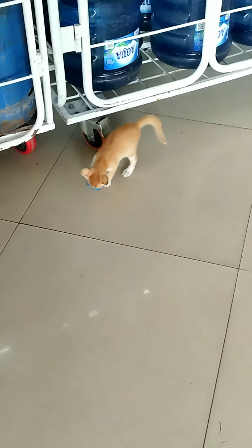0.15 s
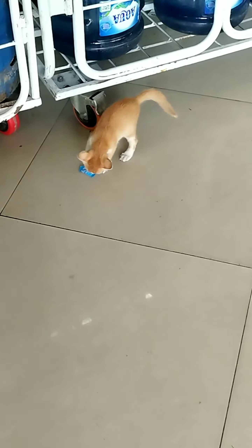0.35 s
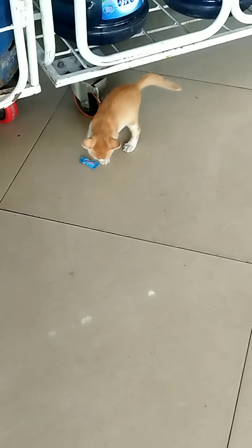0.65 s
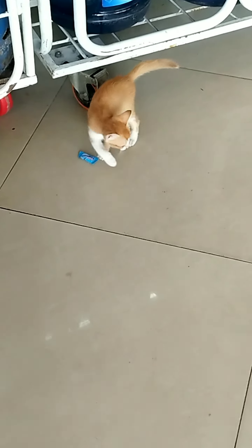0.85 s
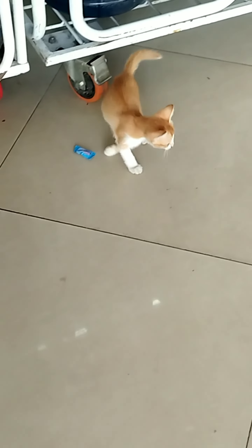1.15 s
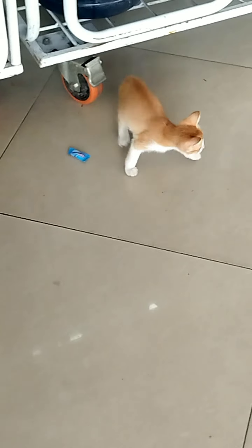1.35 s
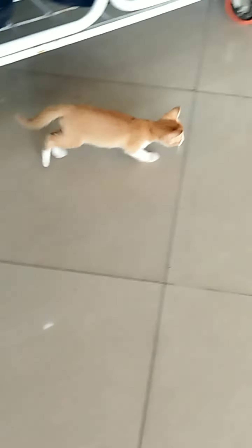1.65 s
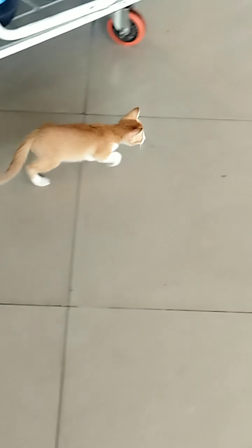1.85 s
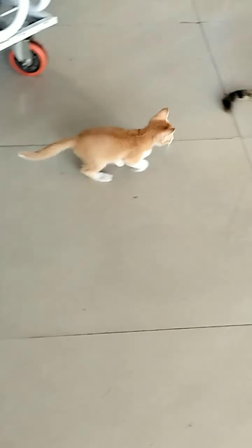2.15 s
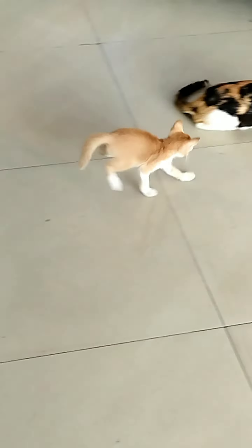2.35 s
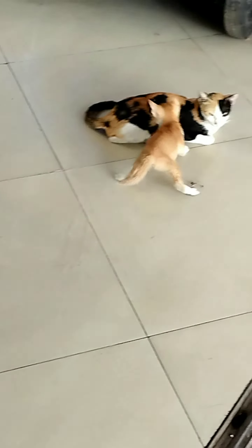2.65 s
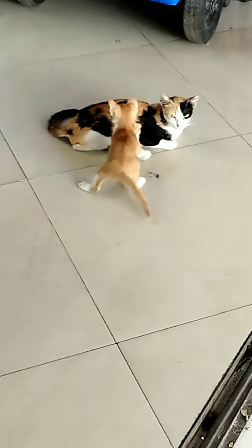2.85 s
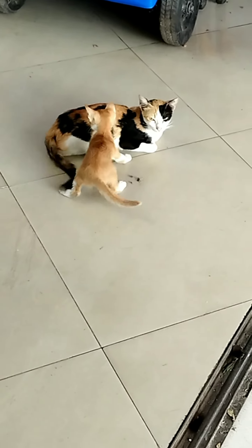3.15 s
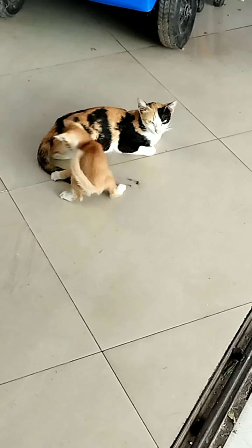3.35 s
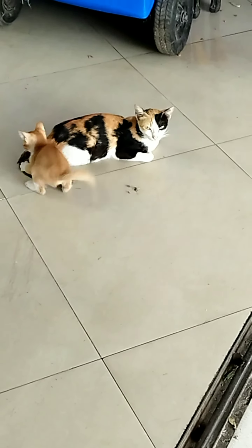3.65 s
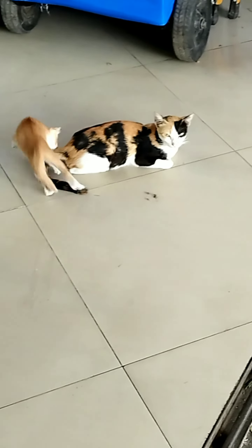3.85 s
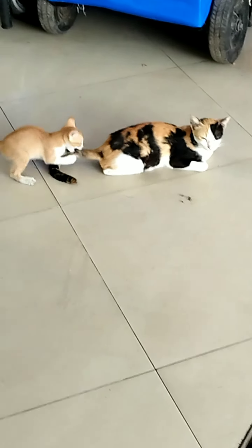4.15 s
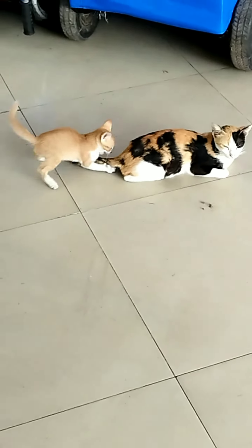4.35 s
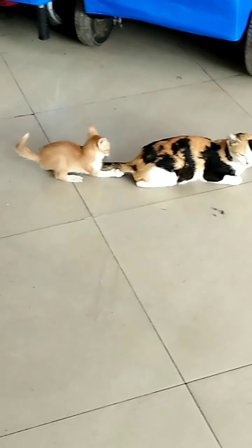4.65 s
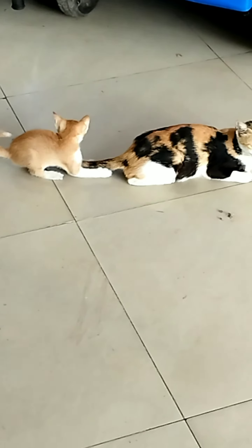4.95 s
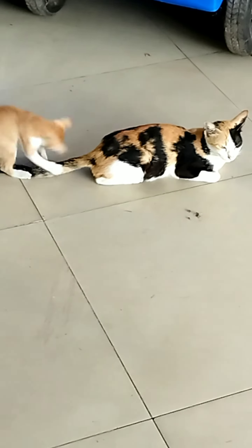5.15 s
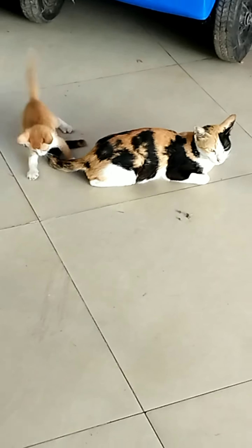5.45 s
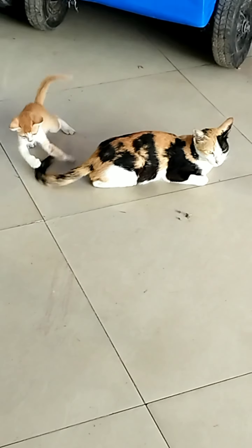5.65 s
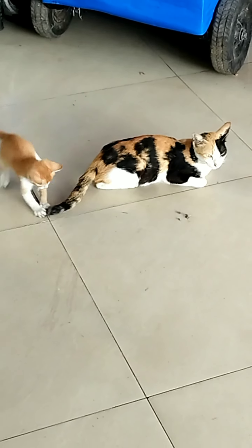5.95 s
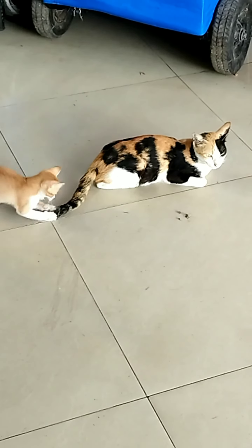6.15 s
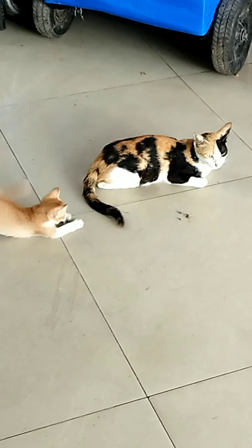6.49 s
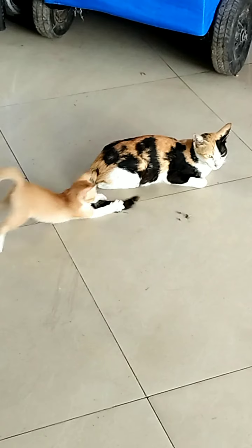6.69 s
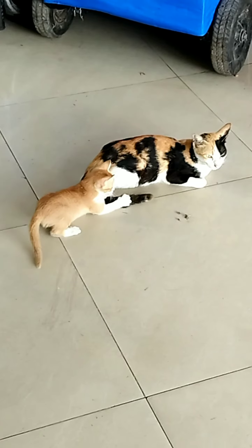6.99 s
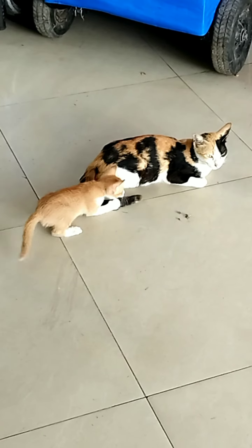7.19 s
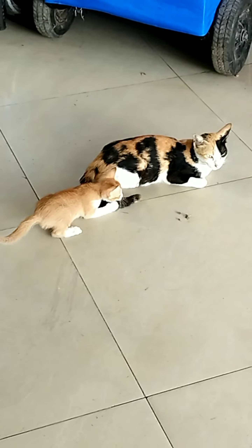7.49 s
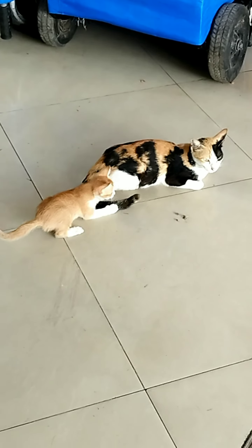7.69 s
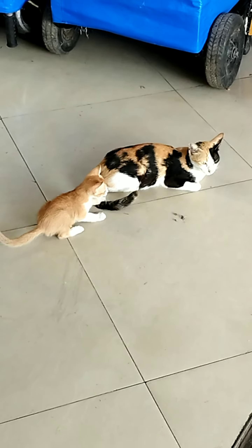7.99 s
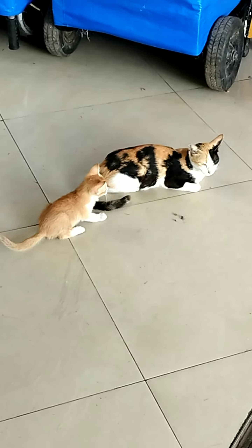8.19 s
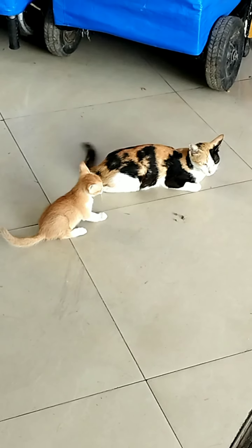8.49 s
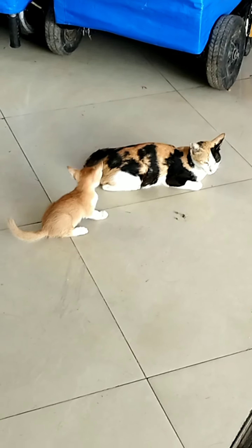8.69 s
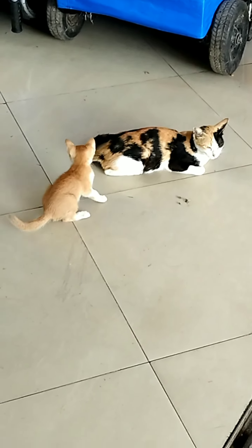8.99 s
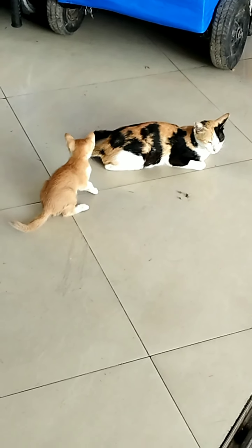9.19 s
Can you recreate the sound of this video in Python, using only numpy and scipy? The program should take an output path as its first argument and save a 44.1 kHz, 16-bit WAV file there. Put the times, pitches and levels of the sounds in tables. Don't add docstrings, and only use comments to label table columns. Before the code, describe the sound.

Low chugging motor idles far off, grows slowly louder toward an open tiled shop, with traffic rumble, fan whine and faint brake squeaks.

```python
import sys
import numpy as np
from scipy import signal
from scipy.io import wavfile
from scipy.ndimage import uniform_filter1d, minimum_filter1d

SR = 44100
rng = np.random.default_rng(int(sys.argv[2]) if len(sys.argv) > 2 else 0)


def generate_wav(sig):
    pcm = np.round(np.clip(np.atleast_2d(sig).T, -1, 1) * 32767).astype(np.int16)
    wavfile.write(sys.argv[1], SR, pcm)


def linear_from_db(decibels):
    return 10 ** (np.asarray(decibels, float) / 20)


N = 411453


def rms_one(x):
    return x / np.sqrt(np.mean(x ** 2) + 1e-20)


def in_time(rows):
    s, *columns = np.transpose(rows)
    return [np.interp(np.arange(N) / SR, s, c) for c in columns]


def at_hz(points, hz):
    table_hz, values = np.transpose(points)
    return np.interp(np.log(hz), np.log(np.maximum(table_hz, 1)), values)


def bump(s, half):
    return np.exp(-((np.arange(N) / SR - s) / half) ** 2)


def drift(rate):
    r = np.exp(-80 * np.pi * rate / SR)
    noise = rng.standard_normal(N // 40 + 2002)
    slow = signal.lfilter([1], [1, -2 * r, r * r], noise)[2000:]
    return np.interp(np.arange(N) / 40, np.arange(len(slow)), rms_one(slow - slow.mean()))


def resonance(x, hz, width):
    r = np.exp(-np.pi * width / SR)
    poles = [1, -2 * r * np.cos(2 * np.pi * hz / SR), r * r]
    return signal.lfilter(np.array([1, 0, -1]) * (1 - r * r) / 2, poles, x)


def whistle(hz, width):
    noise = rng.standard_normal((2, N))
    return rms_one(resonance(resonance(noise, hz, width), hz, width))


def pan(x, db):
    return x * linear_from_db(np.array([[db / 2], [-db / 2]]))


# multiple, level/dB, share of nearness, gain in line with the doorway/dB
ORDERS = [(2, -57.5, 0.2, -14), (3, -32.5, 0.86, 0.5), (4.25, -31.0, 0.94, 4), (4.93, -20, 1.08, 6.5),
          (6.09, -24.5, 1.25, 14), (7.12, -38.5, 0.3, 9.5), (7.8, -42, 0.32, 1), (8.8, -38.5, 1.87, 10),
          (9.7, -34.0, 0.95, 11.5), (11.2, -42.5, 0.9, 5.5), (12, -46, 1, -0.5), (13, -54, 0.2, 15.5),
          (14.5, -47, 1, 9.5), (14.9, -47.5, 0.98, 9), (16.35, -49.5, 1.14, 11.9), (16.85, -54, 0.5, 9),
          (18, -57, 0.2, 9.5), (21.6, -60.5, 0.2, 6.5), (22.65, -65, 0.37, 17), (23.8, -60, 0.2, 3.9),
          (26.9, -62.5, 0.2, 8), (28.1, -64, 0.85, 11), (29.33, -63.5, 0.2, -8)]
# t/s, multiple, level/dB, half length/s
NODES = [(0.61, 6, -8.5, 0.64), (1.78, 5, -8.5, 0.33), (2.374, 10, -19.7, 0.061), (2.41, 5, -6.5, 0.23),
         (3.15, 4, -25, 0.041), (3.93, 6, -16.5, 0.47), (4.16, 3, -10, 1.0), (4.19, 9, -13, 0.5),
         (4.72, 6, -21, 0.063), (4.87, 5, -15.5, 0.17), (5.395, 6, -20, 0.5), (5.412, 5, -11, 0.22),
         (5.54, 13, -7, 0.15), (6.158, 7, -9, 0.16), (6.214, 6, -24.0, 0.23), (6.383, 5, -25, 0.12),
         (6.444, 3, -24, 0.06), (6.54, 7, -26, 0.12), (6.64, 5, -9.5, 1.0), (6.792, 9, -19, 0.031),
         (6.875, 10, -6, 0.5), (6.878, 5, -19, 0.06), (6.99, 6, -15.5, 0.32), (7.93, 10, -16.4, 0.032),
         (7.97, 3, -9, 0.13), (8.203, 5, -4.5, 0.094), (8.816, 7, -14.6, 0.13), (9.082, 10, -9, 0.048),
         (9.16, 4, -20, 0.072), (9.23, 9, -11, 0.16)]
# t/s, multiple, level/dB, half length/s
CRESTS = [(0.166, 6, 12.5, 0.07), (0.514, 11, 9, 0.3), (1.33, 4, 7, 0.95), (1.93, 5, 12.0, 0.1),
          (2.39, 4, 12.0, 0.18), (3.13, 16, 12.0, 0.13), (3.59, 7, 11, 0.67), (3.84, 8, 6.5, 0.37),
          (4.05, 12, 8.5, 1), (4.2, 11, 8.5, 0.34), (4.39, 15, 6.5, 0.32), (4.56, 7, 5.5, 0.17),
          (4.632, 4, 5.9, 0.56), (4.665, 14, 8, 0.22), (5.55, 11, 11, 0.72), (6.12, 8, 11.5, 0.39),
          (6.61, 12, 11, 0.47), (6.76, 11, 7.5, 0.14), (6.86, 4, 7.5, 1.0), (7.133, 28, 11.5, 0.16),
          (7.19, 8, 13, 0.18), (7.394, 10, 8.5, 0.12), (7.44, 11, 5, 0.054), (7.465, 17, 9.5, 0.71),
          (7.508, 12, 12.5, 0.32), (7.524, 9, 5, 0.26), (7.977, 11, 10.5, 0.21), (8.04, 13, 15, 0.38),
          (8.51, 8, 7, 1), (8.55, 7, 8.5, 0.52)]
# f/Hz, half width/Hz, level/dB
SHOP_PEAKS = [(132.5, 12.4, 1.5), (191.6, 9.0, 2.5), (288, 17, .3)]
FADE_RATE, WANDER_RAD, UNEVEN_DB, SIDE_DB = 4.5, 1.5, .4, -20
FAR_WANDER_RAD = .15
BLUR_RAD, HUNT_TURNS, SPREAD_RAD = .055, .005, .045
SCATTER, SCATTER_GROWTH = .16, .8
SCATTER_NEAR_SHARE = .6


def exhaust(per_s, near_db, in_line):
    turns = np.cumsum(per_s) / SR + HUNT_TURNS * drift(2.7)
    blur = BLUR_RAD * uniform_filter1d(abs(np.gradient(per_s)) * SR, size=SR // 4)
    wander_rad = WANDER_RAD + FAR_WANDER_RAD * np.maximum(-near_db, 0)
    near_scatter = SCATTER * linear_from_db(-SCATTER_NEAR_SHARE * np.maximum(near_db, 0))
    mid = side = 0
    for multiple, db, share, doorway_db in ORDERS:
        order = round(multiple)
        standing_db = sum(depth_db * bump(s, half)
                          for s, k, depth_db, half in NODES + CRESTS if round(k) == order)
        shop_db = sum(peak_db * np.exp(-((order * per_s - hz) / half_hz) ** 2)
                      for hz, half_hz, peak_db in SHOP_PEAKS)

        scatter = near_scatter * (multiple / 5) ** SCATTER_GROWTH
        echoes = 1 + scatter * (drift(FADE_RATE) + 1j * drift(FADE_RATE))
        fade = 20 * np.log10(rms_one(abs(echoes)))
        level_db = db + share * near_db + doorway_db * in_line + standing_db + shop_db + fade

        phase = 2 * np.pi * order * turns + wander_rad * drift(0.32)
        phase = phase - SPREAD_RAD * (multiple - 12) ** 2
        phase = phase + blur * np.sqrt(multiple / 5) * drift(10.0) + np.angle(echoes)

        uneven_db = UNEVEN_DB * max(1, multiple / 8) * drift(10)
        mid = mid - np.sqrt(2) * linear_from_db(level_db + uneven_db) * np.sin(phase)
        leak_db = SIDE_DB + 7.2 * np.log2(min(multiple, 20) / 5) + 2.3 * drift(2.5)
        side = side - np.sqrt(2) * linear_from_db(level_db + leak_db) * np.cos(phase + 1.0 + drift(0.23))
    return mid + side * [[1], [-1]]


# f/Hz, width/Hz, level/dB
SHELL = [(171, 51, 3), (321, 24, 13), (439, 110, 4), (676, 40, -4.5), (811, 90, -4)]
SHELL_DB, PUFF_SPREAD_DB = -44, 1.5


def shell(turns, nearness_db):
    strength = linear_from_db(PUFF_SPREAD_DB * rng.standard_normal(400))[turns.astype(int)]
    puffs = strength * np.exp(-2 * (turns % 1)) * rng.standard_normal((2, N))
    puffs = puffs[0] + .3 * puffs[1] * [[1], [-1]]
    rung = sum(linear_from_db(db) * resonance(resonance(puffs, hz, width), hz, width) for hz, width, db in SHELL)
    return linear_from_db(SHELL_DB + nearness_db) * rms_one(rung)


# t/s, level/dB
STREET = [(0, 0.5), (1, -0.7), (1.4, 0), (2.3, -0.3), (4, 0.0), (5.1, 1.6), (5.9, 3.5), (6.2, 3),
          (7.07, 4.5), (7.64, 5), (7.82, 0.5), (7.97, 2), (8.2, 3.5), (8.5, 3.5), (8.8, 0.5), (8.99, 2.5),
          (9.1, 0), (9.33, 3.5)]
# f/Hz, level/dB
ROAR = [(18, -17.5), (53, -11), (200, -10), (530, -22), (760, -24.5), (1030, -25), (2100, -33),
        (3300, -39.5), (4400, -45), (6500, -46.5), (8300, -42), (10300, -48.5), (12300, -56), (16000, -66)]
# f/Hz, correlation
LIKENESS = [(60, .97), (130, .98), (290, .9), (640, .5), (1100, 0), (15000, 0)]
# f/Hz, level/dB
TILT = [(60, 0), (200, -1.5), (690, 0), (1280, -3.6), (2360, -1.3), (4350, -2.6), (7500, -1.5), (9700, 3),
        (13000, 0)]
# f/Hz, share of the swell
SWELL_SHARE = [(300, 0.41), (600, 0.64), (2500, 1.1), (7000, 1.35), (13000, 0.79)]
ROAR_DB, THROB_DB = -31.5, 0.26
RECEDE_DB, RECEDE_S, RECEDE_HZ = 4, 2.6, 2100
CLOSE_HISS_DB, CLOSE_S, CLOSE_HALF_S, CLOSE_HISS_HZ = 2.5, 9.3, 1.1, 12500


def street(turns):
    traffic_db = in_time(STREET)[0]
    leaving_db = RECEDE_DB * np.exp(-np.arange(N) / SR / RECEDE_S)
    close_db = CLOSE_HISS_DB * bump(CLOSE_S, CLOSE_HALF_S)
    throb = THROB_DB * np.cos(2 * np.pi * turns)
    out, together = 0, drift(2.5)
    edges = 18 * 2 ** np.arange(0, 10.1, .4)
    white = rng.standard_normal((2, 2, N))
    for k, (low, high) in enumerate(zip(edges, edges[1:])):
        band = signal.butter(2, [low, high], "band", fs=SR, output="sos")
        mid, side = signal.sosfilt(band, white[k % 2])
        hz = np.sqrt(low * high)
        alike = np.clip(at_hz(LIKENESS, hz), -1, 1)
        swell = at_hz(SWELL_SHARE, hz) * traffic_db
        swell = swell + leaving_db * np.exp(-np.log2(hz / RECEDE_HZ) ** 2 / 2)
        swell = swell + close_db * np.exp(-np.log2(hz / CLOSE_HISS_HZ) ** 2)
        gain = linear_from_db(at_hz(ROAR, hz) + swell + throb + 0.17 * together + 0.51 * drift(11))
        stereo = np.sqrt(1 + alike) * mid + np.sqrt(1 - alike) * side * [[1], [-1]]
        out = out + pan(gain, at_hz(TILT, hz)) * stereo
    return linear_from_db(ROAR_DB) * out / np.sqrt(np.mean(out[:, :4 * SR] ** 2))


# f/Hz, width/Hz, level/dB
HUMS = [(1031, 7.9, -50), (1265, 8.2, -56), (962, 4, -60), (1515, 7.9, -58.5)]
FAN_FADE_S, FAN_FADE_DB = 2.7, -3.5


def fans():
    t, out = np.arange(N) / SR, 0
    for hz, width, db in HUMS:
        tone = linear_from_db(2 * drift(3.0)) * np.sin(2 * np.pi * hz * t + 2 * drift(2.45) + [[0], [1.5]])
        out = out + pan(linear_from_db(db), -7.0) * (tone + 0.49 * whistle(hz, width))
    return out * linear_from_db(FAN_FADE_DB / (1 + np.exp(2 * (FAN_FADE_S - t))))


# middle t/s, half length/s, f/Hz, level/dB, left minus right/dB
SQUEALS = [
    (1.45, .9, 5380, -63.5, -1.5),
    (6.8, .5, 9680, -62, 5.0),
    (6.7, .6, 6000, -68, -5.0),
    (9.28, .22, 610, -42, 0),
    (7.1, .45, 810, -51, 0),
]
SQUEAL_WIDTH_HZ, SQUEAL_SHARPNESS = 40, 25


def squeals():
    out = 0
    for s, half, hz, db, pan_db in SQUEALS:
        width = SQUEAL_WIDTH_HZ + hz / SQUEAL_SHARPNESS
        out = out + pan(linear_from_db(db) * bump(s, half), pan_db) * whistle(hz, width)
    return out


# t/s, firings per s
SPEED = [(0, 27.9), (.3, 27.3), (1, 27.05), (1.83, 26.7), (2, 28.4), (2.25, 31), (2.44, 32.3), (2.55, 30.8),
         (2.75, 26.9), (3.8, 26.85), (4.42, 27.2), (4.7, 28.6), (5.1, 28.5), (6.2, 29.05), (6.9, 29.3),
         (7.3, 28.95), (8.2, 29.2), (9.33, 29.45)]
# t/s, level/dB
NEARNESS = [
    (0, -12),
    (1, -5.9),
    (2.5, -7),
    (3.2, -3),
    (3.7, -2),
    (5.2, -1.2),
    (6.3, -0.5),
    (7.8, 4),
    (9.33, 5.5),
]
DOORWAY_S, DOORWAY_HALF_S = 5.866, 1.43
SHELL_NEAR_SHARE, SHELL_DOORWAY_DB, PORT_DB = 1, 3, 0.67


def scene():
    per_s, near_db = in_time(SPEED)[0], in_time(NEARNESS)[0]
    in_line = bump(DOORWAY_S, DOORWAY_HALF_S)
    turns = np.cumsum(per_s) / SR
    shell_db = SHELL_NEAR_SHARE * near_db + SHELL_DOORWAY_DB * in_line
    engine = exhaust(per_s, near_db, in_line) + shell(turns, shell_db)
    return pan(engine, PORT_DB) + street(turns) + fans() + squeals()


# from t/s, to t/s, lowest f/Hz, share dropped
STARVED = [(6.52, 6.58, 2500, .3), (6.6, 6.78, 6500, .2), (7.2, 7.72, 2400, .27), (8.2, 8.62, 2800, .22),
           (9.22, 9.27, 2400, .3), (0, 9.4, 12400, .4), (0, 5.4, 12000, .25)]


def starve(x):
    hz, t, cells = signal.stft(x, SR, nperseg=2048)
    share = sum(part * ((t > a) & (t < b)) * (hz > low)[:, None] for a, b, low, part in STARVED)
    chance = np.repeat(rng.random((len(hz) // 6 + 1, len(t))), 6, axis=0)[:len(hz)]
    kept = cells * (chance >= share) / np.sqrt(1 - share)
    return signal.istft(kept, SR, nperseg=2048)[1][:, :N]


def low_pass(x):
    return signal.sosfilt(signal.butter(12, 15380, fs=SR, output="sos"), x)


TOP = .58


def record(dry):
    swing = -minimum_filter1d(-abs(dry).max(axis=0), size=801)
    gain = uniform_filter1d(np.minimum(1, TOP / swing), size=801)
    mix = starve(dry * gain)
    return low_pass(mix)


dry = scene()
out = record(dry)
generate_wav(out)
```